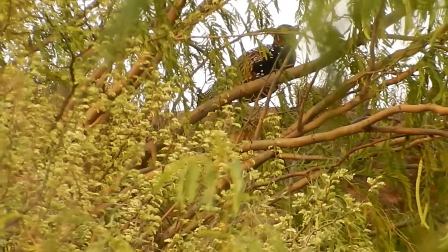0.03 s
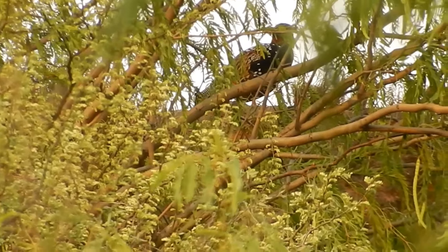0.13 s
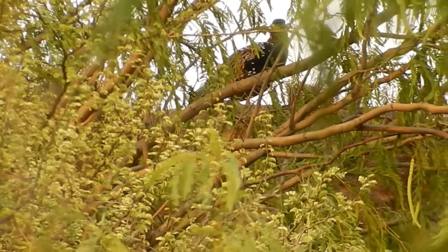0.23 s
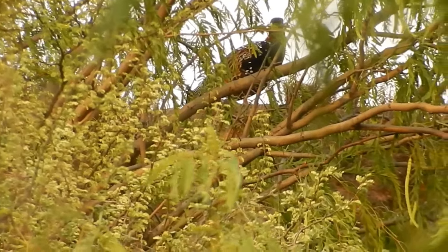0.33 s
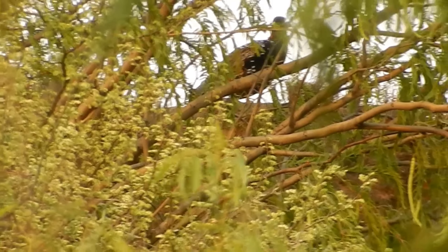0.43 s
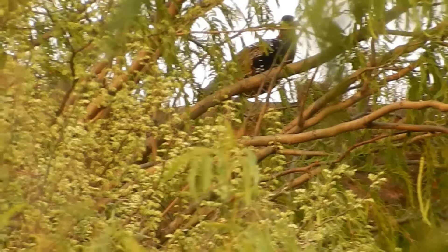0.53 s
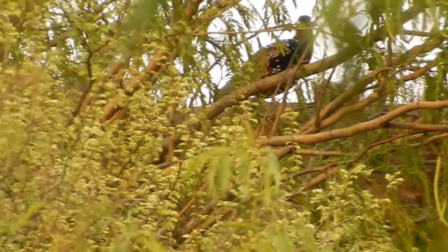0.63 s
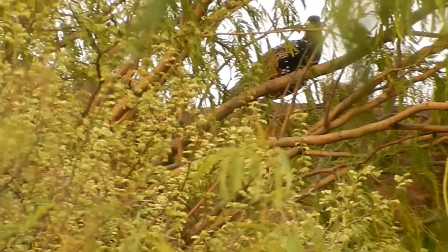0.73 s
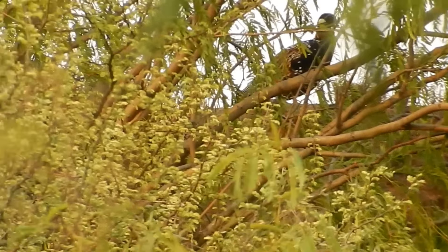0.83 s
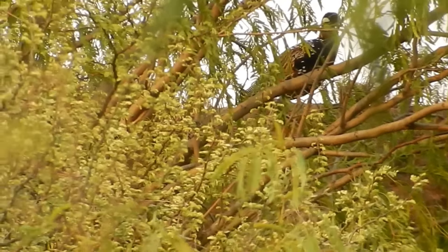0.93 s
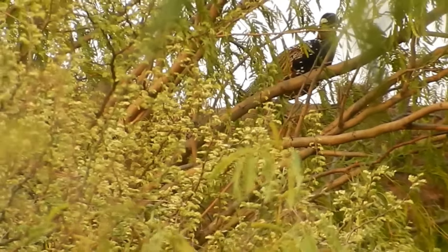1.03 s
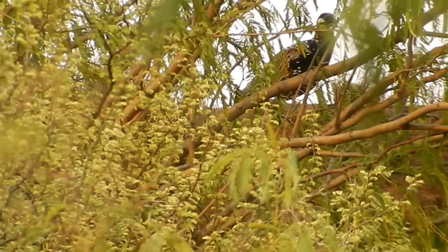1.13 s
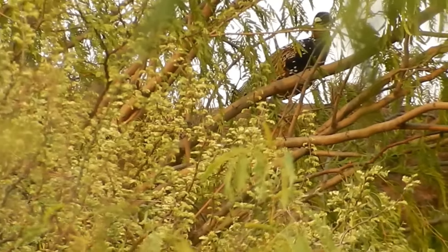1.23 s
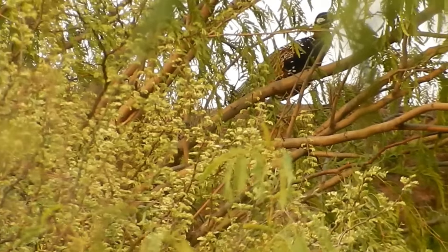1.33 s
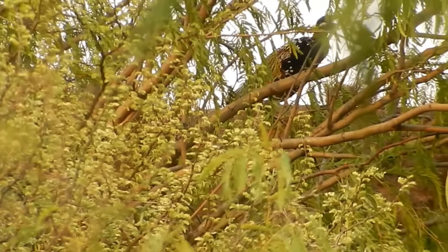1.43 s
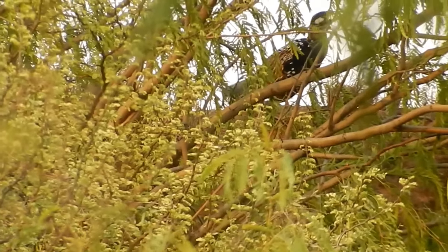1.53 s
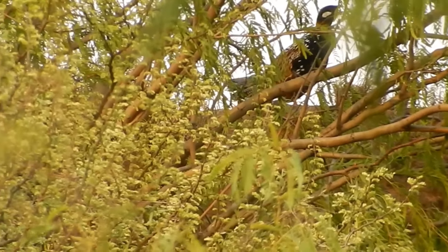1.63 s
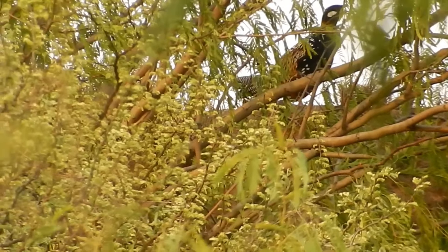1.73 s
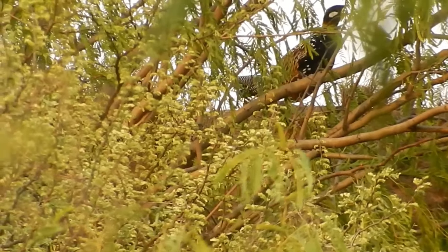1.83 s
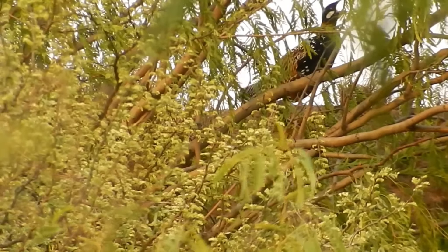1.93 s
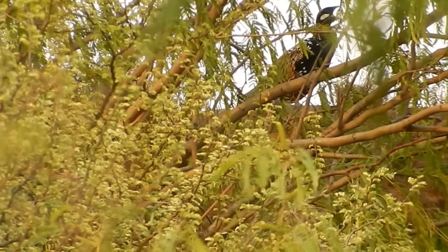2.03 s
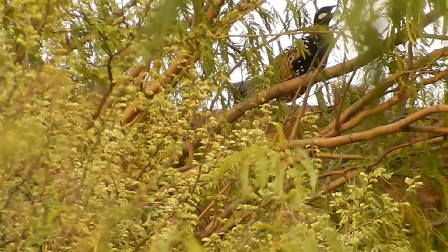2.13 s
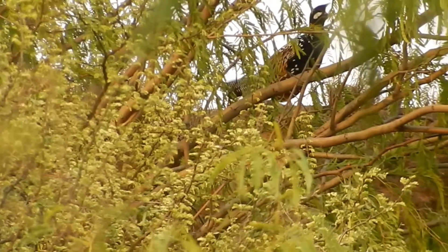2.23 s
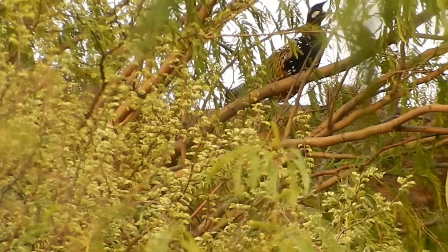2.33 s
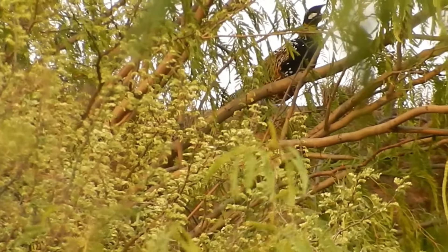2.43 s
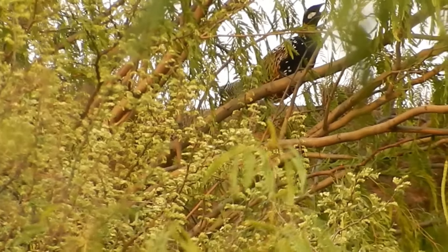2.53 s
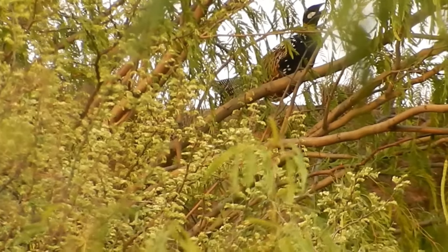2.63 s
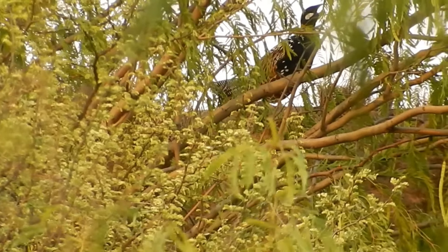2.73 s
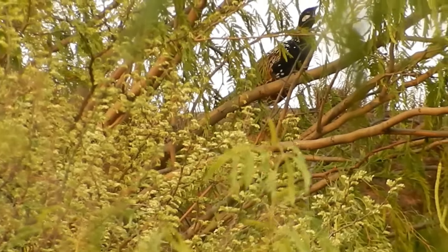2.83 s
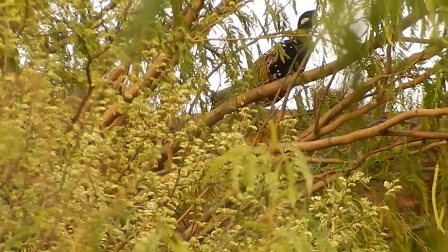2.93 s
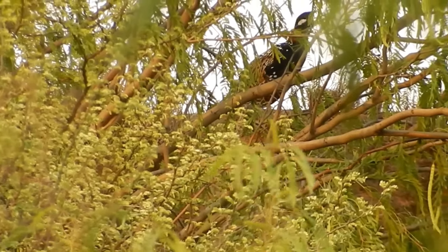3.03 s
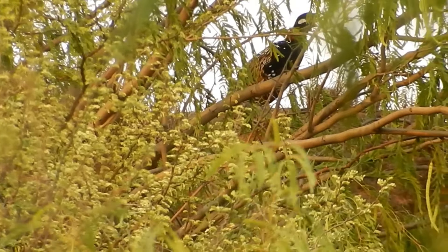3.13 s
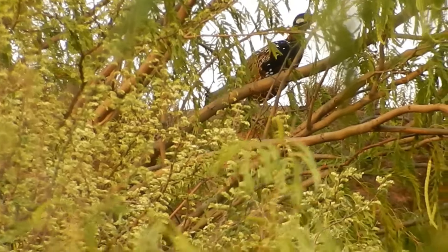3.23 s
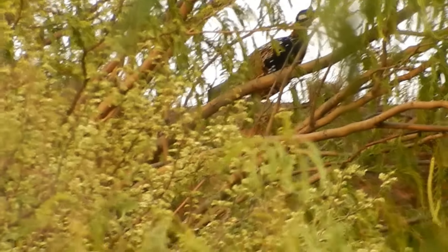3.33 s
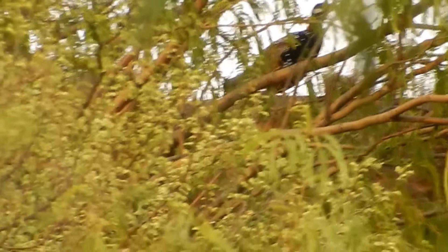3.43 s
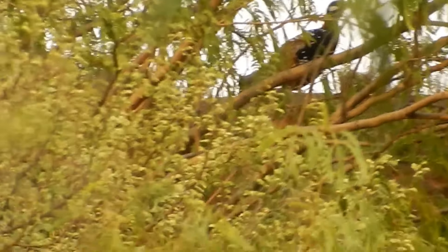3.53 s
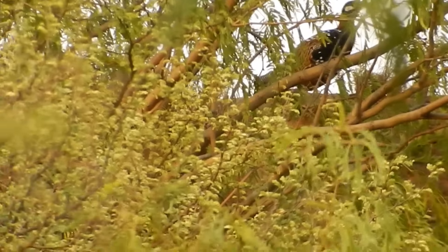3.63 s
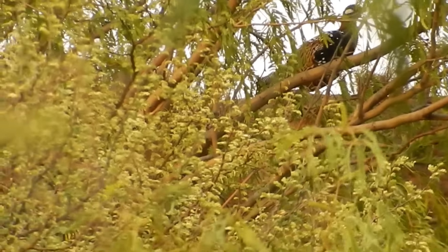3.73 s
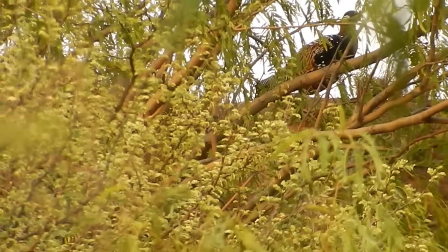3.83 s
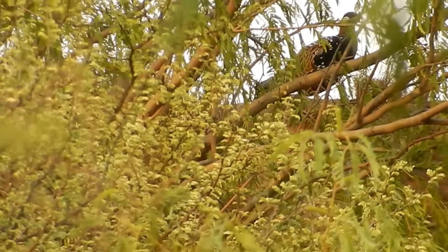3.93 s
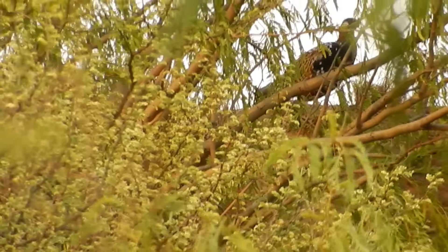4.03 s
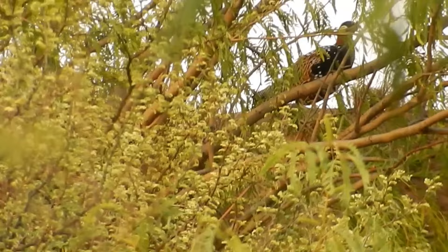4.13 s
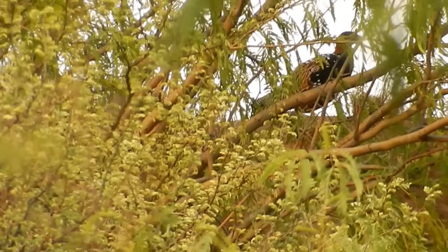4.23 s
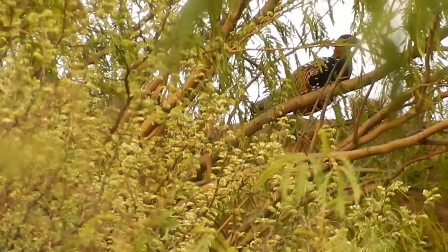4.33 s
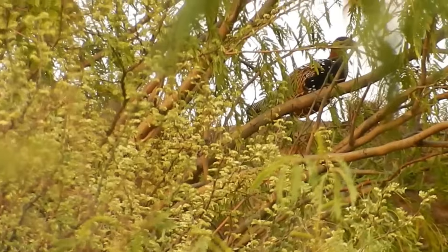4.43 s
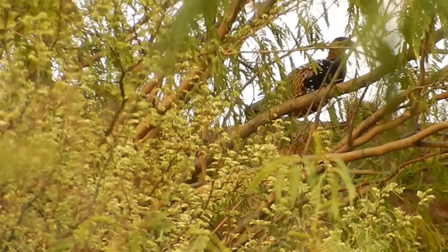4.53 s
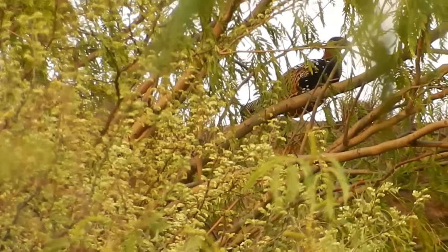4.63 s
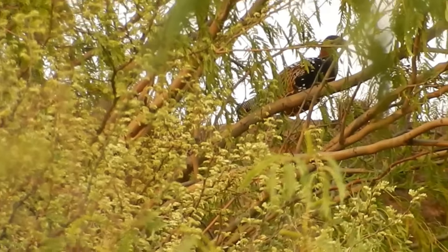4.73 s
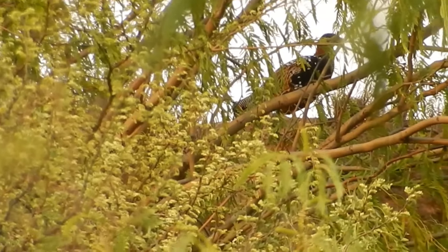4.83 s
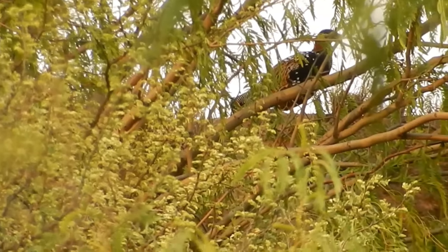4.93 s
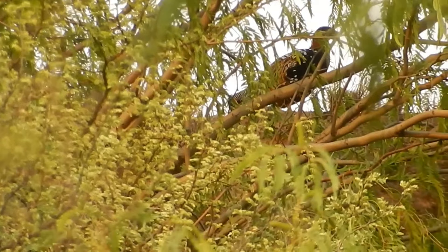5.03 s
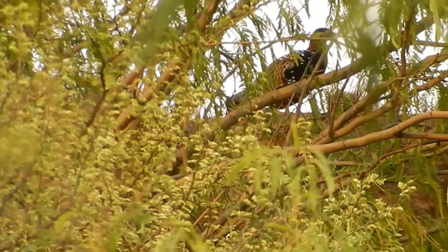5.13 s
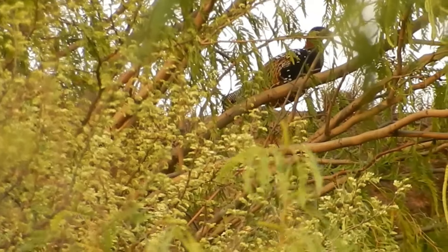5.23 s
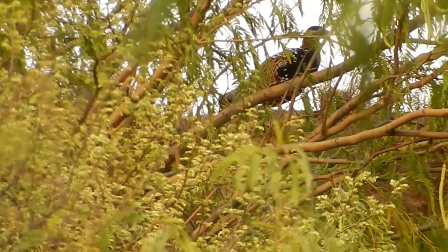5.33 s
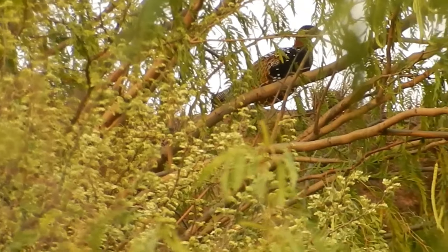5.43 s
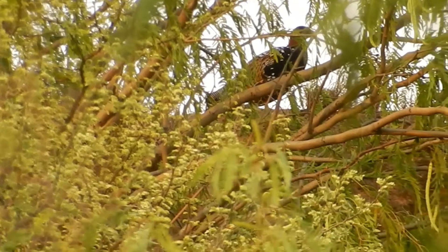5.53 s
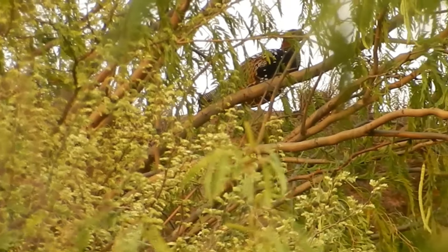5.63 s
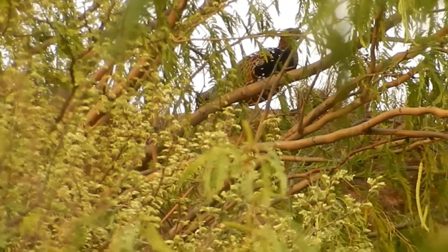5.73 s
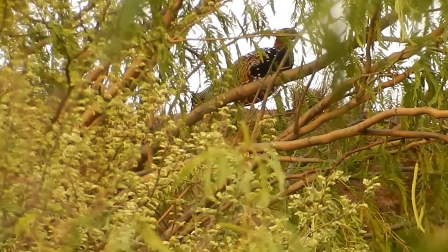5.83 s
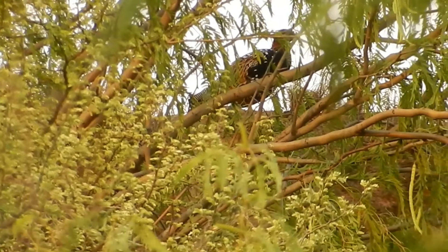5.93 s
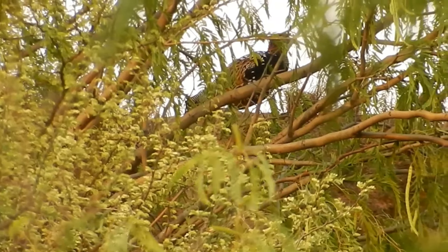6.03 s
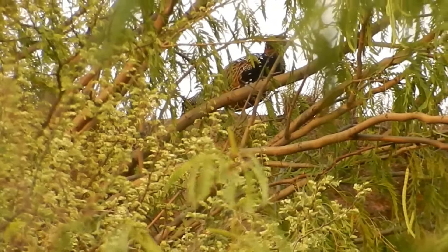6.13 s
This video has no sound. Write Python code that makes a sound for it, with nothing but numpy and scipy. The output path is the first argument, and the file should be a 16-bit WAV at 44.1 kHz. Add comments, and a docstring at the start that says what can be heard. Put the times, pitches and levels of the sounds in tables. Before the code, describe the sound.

Short click-like chirp, then a piercing, grating bird call of four buzzy notes, a faint hoarse note after, trees scattering a soft tail.

```python
"""Among trees, over a low outdoor rumble, a francolin calls: a chip and a whistle, then four loud rasps in two pairs.
A rasp is a high tone thrown up and down by a flutter in the syrinx; twice it breaks into a clean whistle.
Chip and whistles are two coupled gliding voices; a faint hoarse note is soft pulses ringing low throat resonances.
Far birds are thin gliding tones. Filtered noise makes foliage scatter, rumble and hush."""
import sys
import numpy as np
from scipy import signal
from scipy.fft import rfft, irfft, next_fast_len
from scipy.io import wavfile
from scipy.ndimage import uniform_filter1d

SR = 44100
rng = np.random.default_rng(int(sys.argv[2]) if len(sys.argv) > 2 else 0)


def put_to_file(sound):
    """Save the sound as 16-bit audio at rate SR, in the file named by the first command-line argument."""
    columns = np.atleast_2d(sound).T  # one column per channel
    safe = np.clip(columns, -1, 1)
    whole_steps = np.round(safe * 32767)
    wavfile.write(sys.argv[1], SR, whole_steps.astype(np.int16))


N = 272582

# Rasping notes. Each row: start in seconds, length in seconds, level in dB, swell over the note in dB,
# attack in seconds, starting pitch in Hz, top pitch in Hz, share of the note at which pitch tops,
# starting flutter in Hz, roughness at the top from 0 to 1, hiss relative to the tone in dB.
RASP_NOTES = [ (2.236, .188, -24.5, 5, .009, 3498, 4230, .84, 283, .15, -8.5),
              (2.607, .230, -25, -2, .024, 3630, 3906, .66, 257, 0.41, -11),
              (3.111, 0.12, -24.5, 2.5, 0.027, 3507, 3946, .66, 246, 0.38, -15),
              (3.298, .223, -25.5, -3, 0.018, 3610, 3940, 0.77, 248, .58, -12)]
# Throat and beak colour of the rasp. Each row: frequency in Hz, relative gain in dB.
THROAT_COLOUR = [(1000, -21), (1700, -22), (2200, -1.5), (2750, 4.5), (3100, -2), (3650, 4), (4100, -6),
                 (4550, -2.5), (5200, -8), (5900, -4.5), (9000, -14.5), (10300, -22), (15000, -35)]
# Turbulent hiss of the syrinx. Each row: frequency in Hz, relative density in dB per Hz.
HISS_SPECTRUM = [(150, -20), (800, -27.5), (1600, -27.5), (2400, -11), (3600, 2.5), (4900, -28.5),
                 (6200, -21.5), (8700, -32), (10200, -48), (12500, -43), (15000, -58.5)]
# Whistles with the flutter still, alone or inside a rasp. Each row: start in seconds, length in seconds,
# level in dB, dip in the middle in dB, top pitch in Hz, second voice in dB.
WHISTLE_NOTES = [ (1.82, .026, -27, -4.5, 5550, -11.5), (2.774, .026, -29, -7.5, 5645, -15),
                 (3.371, .016, -30, -12, 5690, -24)]
# Course of the opening chip. Each row: time in seconds, pitch in Hz, level in dB, second voice in Hz,
# second voice relative to the first in dB.
CHIP_COURSE = [(1.773, 2867, -54, 1620, -15.5), (1.777, 3270, -41, 1640, -16.5),
               (1.781, 2997, -35.5, 1715, -15), (1.783, 2470, -39, 3306, -5.5),
               (1.788, 1995, -34, 3955, 10.5), (1.792, 1400, -39, 3220, 6), (1.799, 1300, -58.5, 3460, -9)]
# Throat resonances of the hoarse note. Each row: frequency in Hz, width per pass in Hz, gain in dB.
HOARSE_RESONANCES = [(1350, 200, 6.5), (2767, 540, -5.5), (3770, 700, -34)]
# Far birds, one gliding swell each. Each row: start in seconds, length in seconds, level in dB,
# first pitch in Hz, middle pitch in Hz, last pitch in Hz.
FAR_CALLS = [ (3.249, .11, -58.5, 614, 581, 545), (4.159, .055, -72.5, 6150, 5770, 3490),
             (4.174, .05, -67.5, 2810, 2700, 2580), (5.21, .18, -75, 3950, 3230, 2685),
             (5.759, .125, -67.5, 4060, 4320, 4360), (5.934, 0.058, -74, 3450, 3570, 3400)]
# Narrow dips and peaks in the colour of the calls. Each row: frequency in Hz, width in Hz, gain in dB.
CALL_DIPS_AND_PEAKS = [(2495, 130, -18), (2867, 40, 4), (3140, 110, -3), (3400, 40, 4), (3660, 40, 4),
                       (3950, 90, -9), (4565, 40, 4), (4795, 40, 4), (4965, 70, -11), (5040, 50, 8),
                       (5275, 70, 6), (5565, 50, -7), (5625, 40, 4), (5710, 70, -9)]
# Colour of the scatter from the trees. Each row: frequency in Hz, gain in dB.
TREE_COLOUR = [(300, -5.5), (1300, 5), (2750, 7.5), (3250, -2.5), (3750, 1.5), (4300, -.5), (5000, -1),
               (5600, 3.5), (7000, 1.5), (14000, -8)]
# Left minus right level of the calls. Each row: frequency in Hz, difference in dB.
CALL_BALANCE = [(1500, .3), (3000, 0), (4500, -.7), (9000, -.3)]
# Low distant rumble. Each row: frequency in Hz, relative density in dB per Hz.
RUMBLE_SPECTRUM = [(12, -42), (20, -7.5), (49, -1.5), (123, 0.5), (211, -6.5), (305, -8), (419, -12),
                   (461, -11), (900, -17.5), (1170, -49), (1980, -120)]
# Far hush of the landscape. Each row: frequency in Hz, relative density in dB per Hz.
HUSH_SPECTRUM = [(600, -34), (900, -1), (1170, 2.5), (1350, -4), (1650, -4), (1880, 1), (2350, -9.5),
                 (3150, -4), (3700, -13), (4900, -15.5), (7000, -27), (10000, -32.5), (15000, -44.5)]
# Stereo width of the background. Each row: frequency in Hz, side minus mid in dB.
BACKGROUND_WIDTH = [(60, -2.5), (99, -3.5), (160, -1), (270, -0.5), (440, -2.5), (720, -2), (1190, -4),
                    (1960, -4), (3230, -6.5), (5320, -1)]

# Rasp: edges, pitch (time power of the climb, closing pitch), flutter at the end, roughness 0-1.
ONSET_DB, RELEASE_DB, RELEASE_S = -14, -18.5, .022
CLIMB_POWER, CLOSING_HZ, FLUTTER_END_HZ = 1.4, 3580, 223
ROUGH_START, ROUGH_PER_DB = .85, .03
# Random wander of flutter rate and of pitch at full roughness, as shares.
JITTER_SHARE, SCATTER_SHARE = .04, .035
# Level swing either way within a flutter cycle.
PULSE_DB = 7
# Low resonance of the bare windpipe; width per pass.
PIPE_HZ, PIPE_WIDTH_HZ = 1288, 170
# How far and how fast a rasp gives way to a whistle.
BREAK_DB, BREAK_S = -33, .0035
# Whistle: sag at the ends of the arch, steady climb, slides in and out.
ARCH_HZ, WHISTLE_RISE_HZ_PER_S = 270, 7000
SLIDE_S, SLIDE_HZ, SLIDE_DB = .0035, 2700, -14
# Second side of the syrinx: pitch at the whistle's top pitch, level change at mid-arch and on the slides.
SECOND_HZ, SECOND_TOP_DB, SECOND_SLIDE_DB = 3870, -9.5, 6
# Hoarse note: lead-in, sudden start, sagging hold, release.
HOARSE_AT_S, HOARSE_DB = 4.498, -45.5
HOARSE_LEAD_S, HOARSE_LEAD_DB, HOARSE_ATTACK_S = .035, -17.5, .002
HOARSE_HOLD_S, HOARSE_SAG_DB, HOARSE_RELEASE_S, HOARSE_FADE_DB = .074, -6.5, .045, -21
FAR_EDGE_DB = -12  # far call at both ends
RUMBLE_DB, HUSH_DB = -58, -66.5
CUTOFF_HZ = 15700


def rasp(row, full_swing=.38, swing_growth=.25, pulse_lag_rad=.1285, shimmer_db=1, second_db=-8,
         second_ratio=1.14, overtone_db=-23, hiss_growth=.4, pipe_db=-52, pipe_best_db=-37, pipe_range_db=10):
    """Each flutter cycle throws the tone up and down and lets a burst of air through."""
    start, level_db, centre_hz, rough, flutter_hz, hiss_db = effort(row)
    n = len(level_db)
    flutter = turn(flutter_hz * (1 + JITTER_SHARE * rough * wander(130.3, n)))
    # the louder the note, the wider the throw
    swing = full_swing * from_db(swing_growth * (level_db + 22.5))
    voice = 0
    # the two sides of the syrinx open in turn
    for side_rad, side_db, ratio in [(0, 0, 1), (np.pi, second_db, second_ratio)]:
        cycle = flutter + side_rad
        throw = swing * (np.cos(cycle) - 1 / 2)
        scatter = SCATTER_SHARE * rough * wander(500, n)
        phase = turn(centre_hz * ratio * (1 + throw + scatter))
        # the vibration starts afresh each time the membranes part
        opened = 2 * np.pi * np.round(cycle / (2 * np.pi)) - np.pi
        phase = phase - np.interp(opened, cycle, phase)
        pulse_db = PULSE_DB * np.cos(cycle - pulse_lag_rad)
        shimmer = shimmer_db * rough * wander(150, n)
        gate = np.abs(np.cos(cycle / 2)) ** .5 * from_db(side_db + pulse_db + shimmer)
        voice = voice + gate * (np.sin(phase) + from_db(overtone_db) * np.sin(2 * phase))
    # turbulence grows faster than the tone as the bird pushes harder
    push_db = hiss_growth * np.maximum(level_db + 31.5, 0)
    bursts = white(n) * from_db(PULSE_DB / 2 * np.cos(flutter))
    hiss = from_db(hiss_db + push_db) * rms_one(colour(bursts, HISS_SPECTRUM))
    note = even(rms_one(colour(voice, THROAT_COLOUR)) + hiss)
    # the windpipe sounds as the note starts and dies, with the beak half shut
    pipe = rms_one(resonate_twice(white(n), PIPE_HZ, PIPE_WIDTH_HZ))
    half_shut = np.exp(-((level_db - pipe_best_db) / pipe_range_db) ** 2)
    return start, from_db(level_db) * note + from_db(pipe_db) * half_shut * pipe


def effort(row):
    """Through a note the pitch climbs then sinks, the flutter slows, and the weak ends turn rough."""
    (at_s, length_s, db, swell_db, attack_s, low_hz, top_hz, crest,
     flutter_hz, top_rough, hiss_db) = row
    start, t = span(at_s, length_s)
    share = t / length_s
    rise = ramp(share, crest)
    climb, sink = rise ** CLIMB_POWER, ramp(share - crest, 1 - crest) ** 2
    edges_db = ONSET_DB * (1 - ramp(t, attack_s)) + RELEASE_DB * (1 - ramp(length_s - t, RELEASE_S))
    level_db = db + swell_db * (share - .5) + edges_db + BREAK_DB * whistling(at_s + t)
    centre_hz = low_hz + (top_hz - low_hz) * climb + (CLOSING_HZ - top_hz) * sink
    rough = ROUGH_START + (top_rough - ROUGH_START) * (rise - sink) - ROUGH_PER_DB * edges_db
    flutter_hz = flutter_hz + (FLUTTER_END_HZ - flutter_hz) * share ** 2
    return start, level_db, centre_hz, np.clip(rough, 0, 1), flutter_hz, hiss_db


def whistling(s):
    """1 while the tone whistles, 0 while it flutters."""
    amount = 0
    for at_s, length_s, *_ in WHISTLE_NOTES:
        begin = ramp(s - at_s + BREAK_S / 2, BREAK_S)
        end = ramp(at_s + length_s + BREAK_S / 2 - s, BREAK_S)
        amount = amount + begin * end
    return amount


def even(x):
    """Steady air pressure keeps successive cycles about equally strong; local rms near 1."""
    return x / np.sqrt(uniform_filter1d(x ** 2, size=360) + 1e-12)


def whistle(row):
    """The tone slides up, arches and slides off; its second voice is weakest at the top of the arch."""
    at_s, length_s, db, dip_db, top_hz, second_db = row
    start, t = span(at_s - SLIDE_S, length_s + 2 * SLIDE_S)
    t = t - SLIDE_S - length_s / 2  # 0 at the middle
    from_middle = np.abs(t)
    arch = ramp(from_middle, length_s / 2) ** 2
    slide = ramp(from_middle - length_s / 2, SLIDE_S)
    hz = top_hz + WHISTLE_RISE_HZ_PER_S * t - ARCH_HZ * arch - SLIDE_HZ * slide
    level_db = db + dip_db * (1 - arch) + SLIDE_DB * slide
    second_db = second_db + SECOND_TOP_DB * (1 - arch) + SECOND_SLIDE_DB * slide
    second_hz = SECOND_HZ * hz / top_hz
    return start, two_voices(hz, level_db, second_hz, second_db, octave_db=-36, hiss_db=-23.5)


def chip():
    """The two voices cross in one quick, breathy sweep."""
    start, controls = along(CHIP_COURSE)
    return start, two_voices(*controls, octave_db=-17, hiss_db=-15.5)


def two_voices(hz, level_db, second_hz, second_db, octave_db, hiss_db, sum_db=-11, difference_db=-14,
               doubling_db=-24):
    """Both sides of the syrinx sing at once; their coupling adds sum and difference tones."""
    n = len(hz)
    first = turn(hz * (1 + .011 * wander(400, n)))
    second = turn(second_hz * (1 + .0083 * wander(400, n)))
    sum_tone = from_db(sum_db) * np.sin(first + second)
    difference_tone = from_db(difference_db) * np.sin(first - second)
    coupled = np.sin(second) + sum_tone + difference_tone
    # strong and weak cycles alternate a little, which gives half lines
    halves = from_db(doubling_db) * (np.sin(first / 2) + .25 * np.sin(3 * first / 2))
    # air rushes harder while the second side is open
    rush = from_db(hiss_db) * (1 + 2 * from_db(second_db))
    hiss = rush * rms_one(colour(white(n), HISS_SPECTRUM))
    # the octave grows with loudness
    octave = from_db(octave_db + level_db + 26.5) * np.sin(2 * first)
    tone = np.sin(first) + octave + halves + from_db(second_db) * coupled + hiss
    return from_db(level_db) * tone * np.sqrt(2 / (1 + from_db(2 * second_db)))


def hoarse_note(pulse_hz=235, noise=.096):
    """Uneven soft pulses ring the low throat resonances."""
    start, t = span(HOARSE_AT_S - HOARSE_LEAD_S, HOARSE_LEAD_S + HOARSE_HOLD_S + HOARSE_RELEASE_S)
    t = t - HOARSE_LEAD_S
    lead_db = HOARSE_LEAD_DB * (1 - ramp(t, HOARSE_ATTACK_S))
    sag_db = HOARSE_SAG_DB * ramp(t, HOARSE_HOLD_S)
    fade_db = HOARSE_FADE_DB * ramp(t - HOARSE_HOLD_S, HOARSE_RELEASE_S)
    n = len(t)
    cycles = np.floor(turn(pulse_hz * (1 + .118 * wander(117, n))) / (2 * np.pi))
    pulses = np.diff(cycles, prepend=0) + noise * white(n)
    note = sum(from_db(db) * resonate_twice(pulses, hz, width_hz) for hz, width_hz, db in HOARSE_RESONANCES)
    return start, from_db(HOARSE_DB + lead_db + sag_db + fade_db) * rms_one(note)


def far_bird(row):
    """A thin gliding tone that swells, fades and flickers."""
    at_s, length_s, db, first_hz, middle_hz, last_hz = row
    start, t = span(at_s, length_s)
    n, place = len(t), 2 * t / length_s - 1  # place runs from -1 to 1
    bend_hz = (first_hz + last_hz) / 2 - middle_hz
    hz = middle_hz + (last_hz - first_hz) / 2 * place + bend_hz * place ** 2
    tone = np.sin(turn(hz * (1 + .012 * wander(200, n))))
    return start, from_db(db + FAR_EDGE_DB * place ** 2 + 3 * wander(52.5, n)) * rms_one(tone)


def narrow_colour(x):
    """Fixed resonant filters shape narrow dips and peaks in the colour of the calls."""
    for hz, width_hz, db in CALL_DIPS_AND_PEAKS:
        x = x + (from_db(db) - 1) * resonate(x + 1e-18, hz, width_hz)
    return x


def trees(x, near_db=-19, near_t60_s=.34, far_db=-30, far_t60_s=1.67, build_s=.014):
    """Leaves close by scatter a short tail, the wood beyond a long faint one."""
    t = np.arange(2 * SR) / SR
    tail = 0
    for level_db, t60_s in [(near_db, near_t60_s), (far_db, far_t60_s)]:
        decay = from_db(-60 * t / t60_s) * (1 - np.exp(-t / build_s))
        tail = tail + from_db(level_db) * rms_one(rng.standard_normal(len(t)) * decay)
    return signal.fftconvolve(x, colour(tail, TREE_COLOUR) / np.sqrt(len(t)))[:N]


def background(spectrum, level_db):
    """Steady outdoor noise, partly different in each ear."""
    mid, side = [rms_one(colour(rng.standard_normal(N), spectrum)) for _ in range(2)]
    return from_db(level_db) * (mid + colour(side, BACKGROUND_WIDTH) * np.array([[1], [-1]]))


def from_db(db):
    """Decibels to gain."""
    return 10 ** (np.asarray(db) / 20)


def rms_one(x):
    """Scale to an rms of 1."""
    return x / np.sqrt(np.mean(x ** 2) + 1e-20)


def span(start_s, length_s):
    """First sample of a note, and the time since its start."""
    return int(start_s * SR), np.arange(int(length_s * SR)) / SR


def ramp(t, length):
    """Rise from 0 to 1 over this length and stay there."""
    return np.clip(t / length, 0, 1)


def along(rows):
    """First sample of a note, and its columns sample by sample, with rounded corners."""
    s, *columns = np.transpose(rows)
    s = np.sort(s)
    at = np.arange(int(s[0] * SR), int(s[-1] * SR))
    return at[0], [uniform_filter1d(np.interp(at / SR, s, c), size=50) for c in columns]


def turn(hz):
    """Phase of a vibration with this pitch."""
    return 2 * np.pi * np.cumsum(hz) / SR


def white(size):
    """White noise for one note."""
    return rng.standard_normal(32768)[:size]


def wander(rate_hz, size):
    """Smooth random motion of spread 1: noise through two equal one-pole low-passes."""
    r = np.exp(-2 * np.pi * rate_hz / SR)
    smooth = signal.lfilter([1], [1, -2 * r, r * r], rng.standard_normal(32768))
    return rms_one(smooth)[4096:4096 + size]


def resonate(x, hz, width_hz):
    """A resonance with gain 1 at its top."""
    r = np.exp(-np.pi * width_hz / SR)
    poles = [1, -2 * r * np.cos(2 * np.pi * hz / SR), r * r]
    return signal.lfilter(np.array([1, 0, -1]) * (1 - r * r) / 2, poles, x)


def resonate_twice(x, hz, width_hz):
    """Two equal resonances in series, for steeper skirts."""
    return resonate(resonate(x, hz, width_hz), hz, width_hz)


def colour(x, points):
    """Filter by a (Hz, dB) curve, interpolated over log frequency."""
    hz, db = np.transpose(points)
    size = next_fast_len(len(x) + 2048)
    bins_hz = np.maximum(np.arange(size // 2 + 1) * SR / size, 1)
    gain = from_db(np.interp(np.log(bins_hz), np.log(hz), db))
    return irfft(rfft(x, size) * gain, size)[:len(x)]


def add(out, start, sound):
    """Mix a note in, with its ends rounded."""
    n = len(sound)
    out[start:start + n] += sound * signal.windows.tukey(n, min(1, 80 / n))


def scene(tail_side_db=-13):
    """The birds near the centre, their scatter from the trees, and the open air."""
    birds = np.zeros(N)
    calls = [*map(rasp, RASP_NOTES), *map(whistle, WHISTLE_NOTES), chip()]
    for start, sound in [*calls, hoarse_note(), *map(far_bird, FAR_CALLS)]:
        add(birds, start, sound)
    direct = narrow_colour(birds)
    heard = direct + trees(direct)
    call = np.array([colour(heard, [(hz, side * db / 2) for hz, db in CALL_BALANCE]) for side in (1, -1)])
    spread = from_db(tail_side_db) * trees(direct) * np.array([[1], [-1]])
    return call + spread + background(RUMBLE_SPECTRUM, RUMBLE_DB) + background(HUSH_SPECTRUM, HUSH_DB)


def record(dry):
    """A steep elliptic low-pass cuts the top."""
    return signal.sosfilt(signal.ellip(10, .1, 80, CUTOFF_HZ, fs=SR, output="sos"), dry)


dry = scene()
out = record(dry)
put_to_file(out)
```